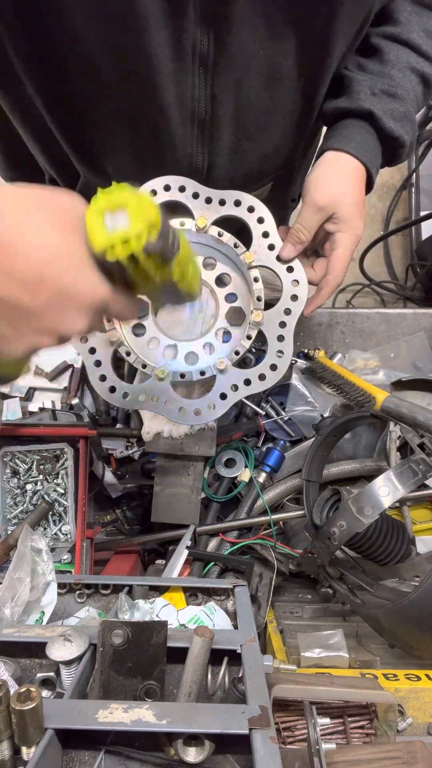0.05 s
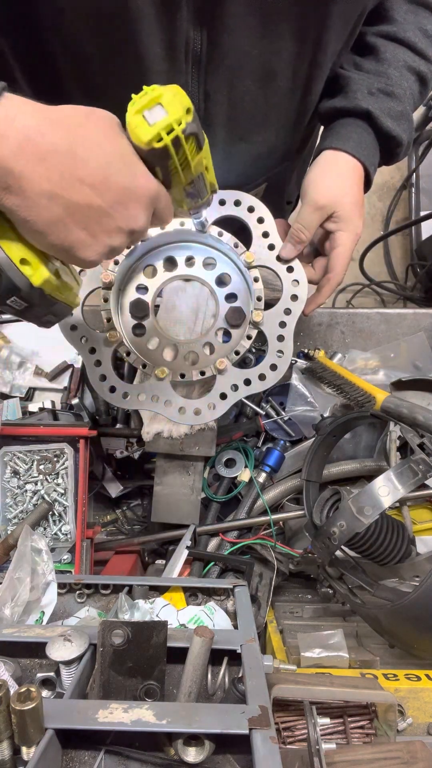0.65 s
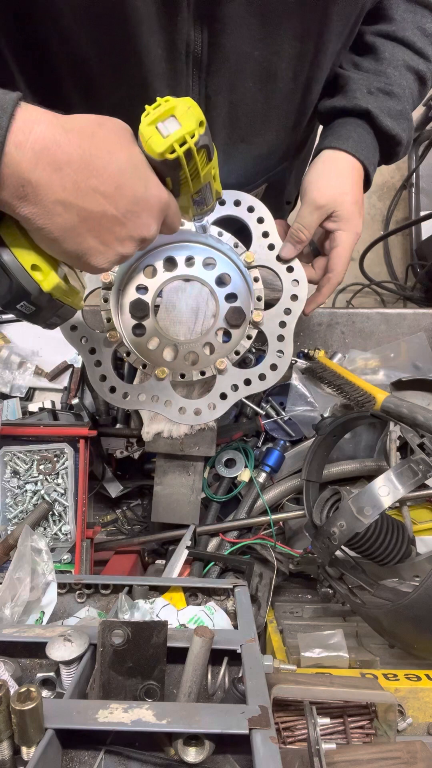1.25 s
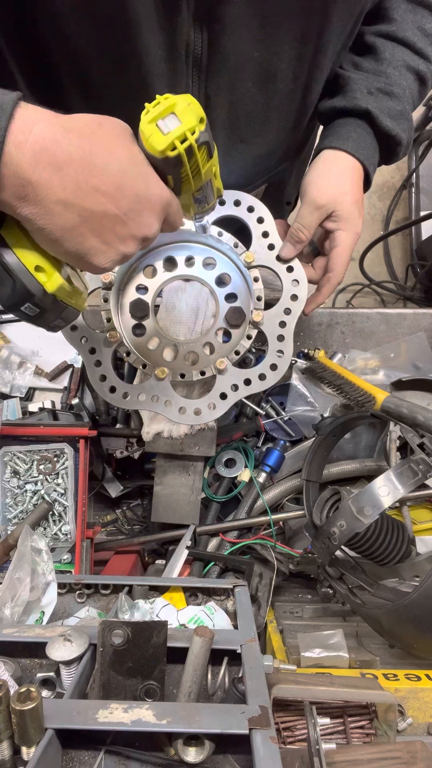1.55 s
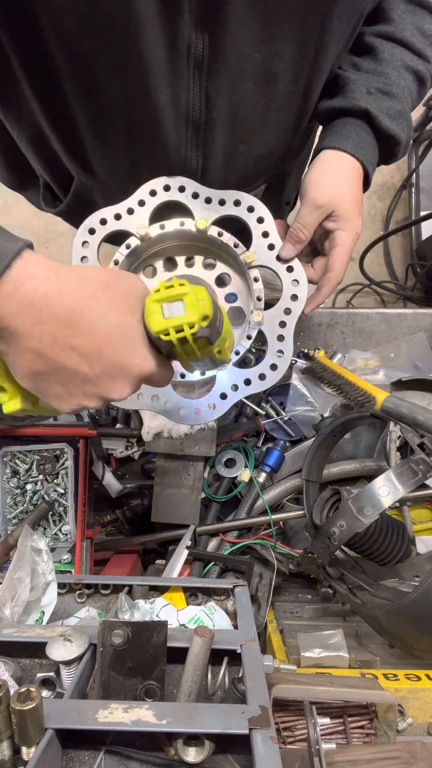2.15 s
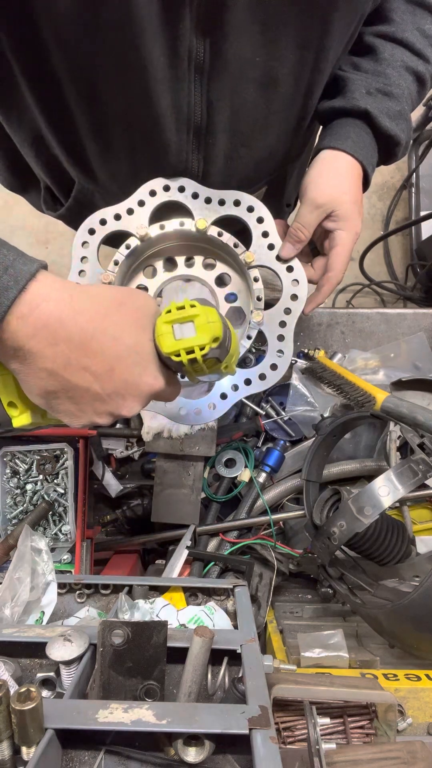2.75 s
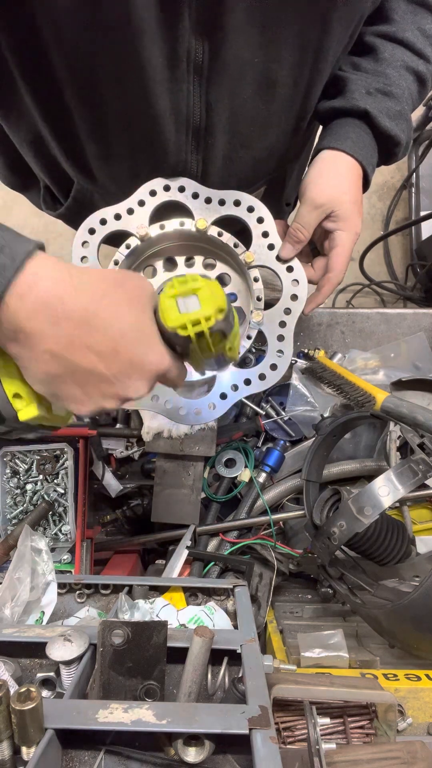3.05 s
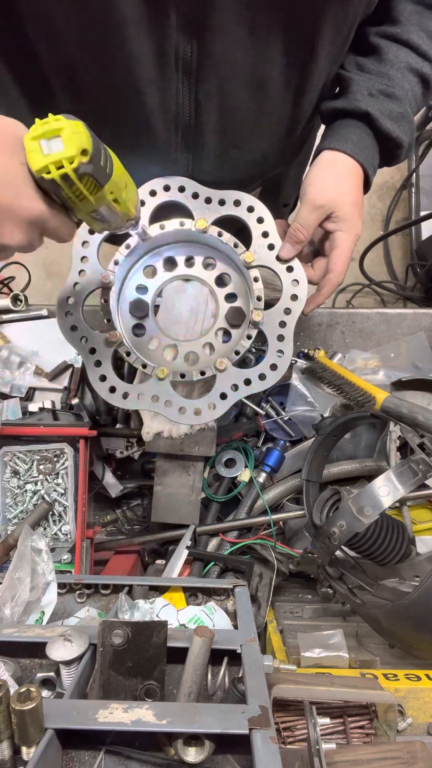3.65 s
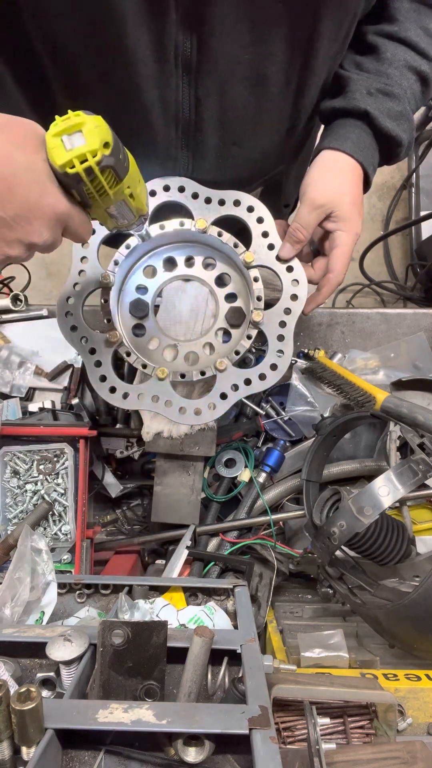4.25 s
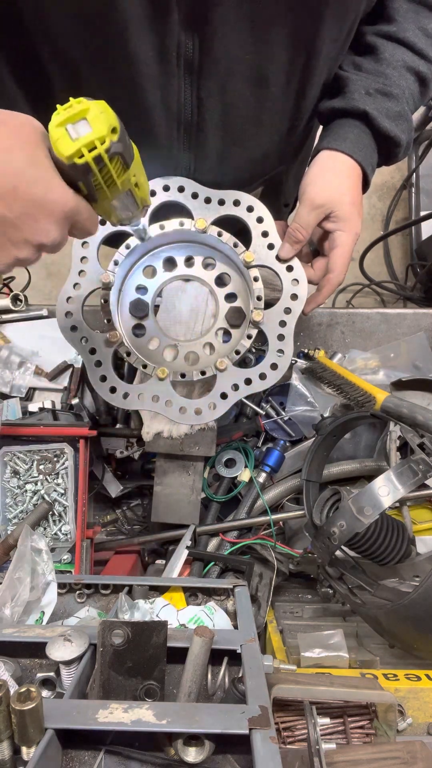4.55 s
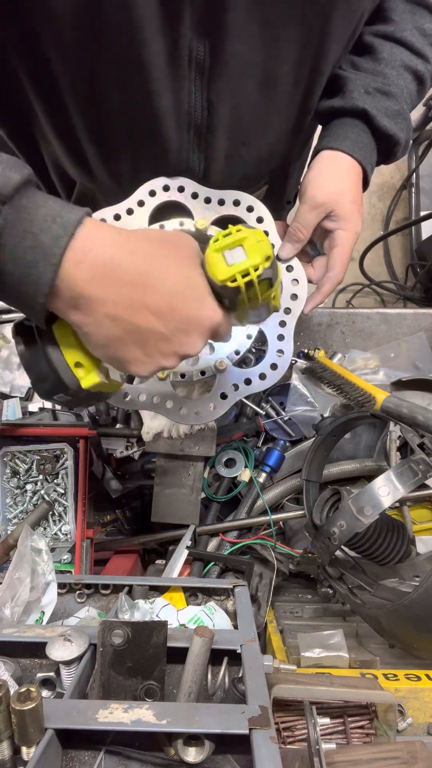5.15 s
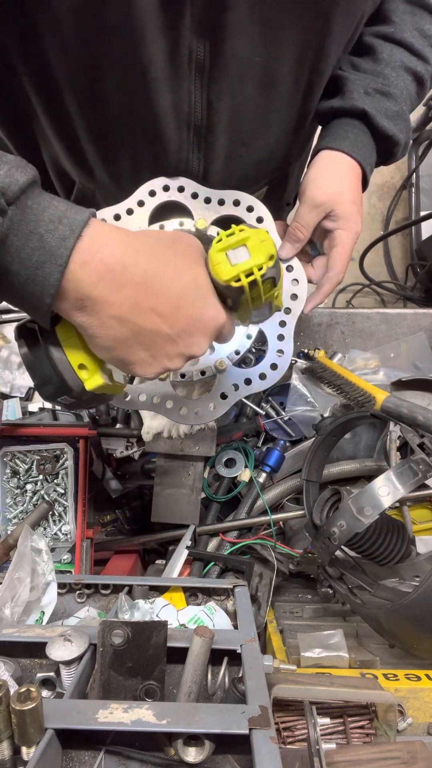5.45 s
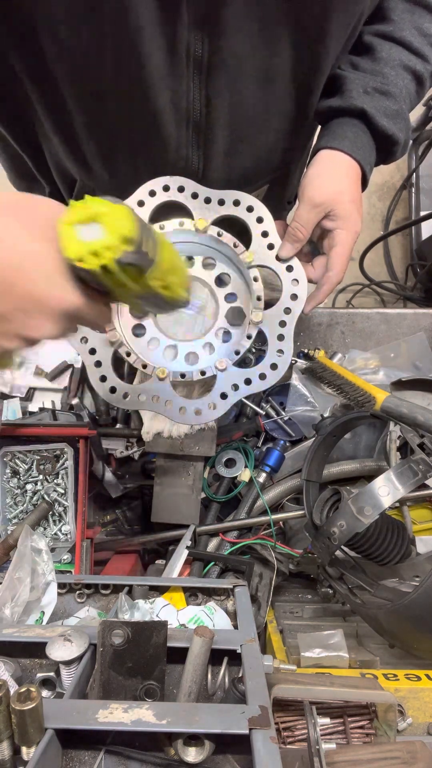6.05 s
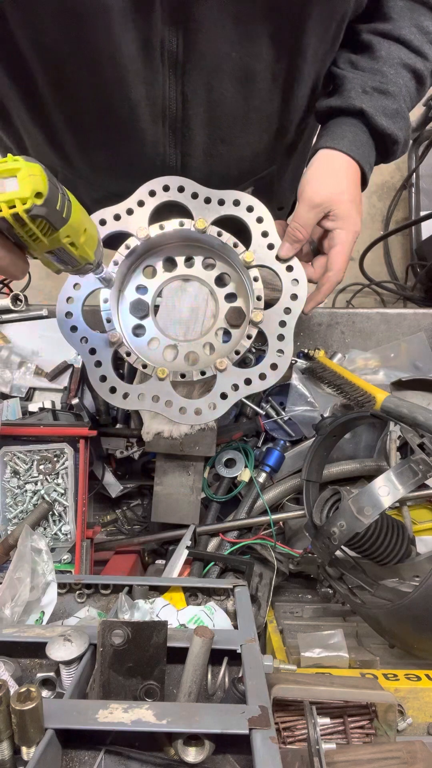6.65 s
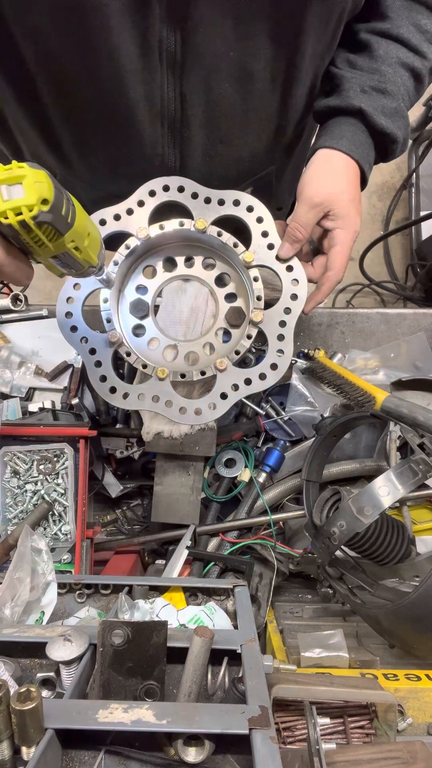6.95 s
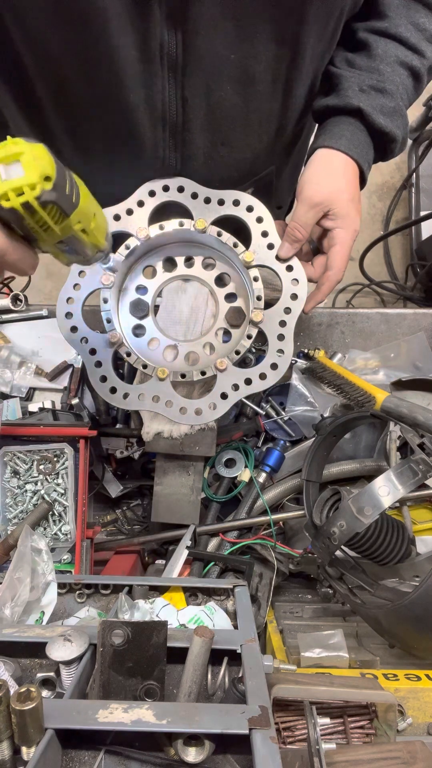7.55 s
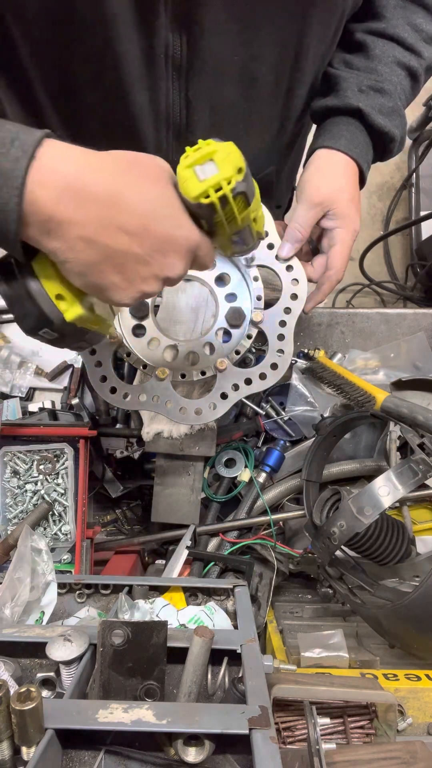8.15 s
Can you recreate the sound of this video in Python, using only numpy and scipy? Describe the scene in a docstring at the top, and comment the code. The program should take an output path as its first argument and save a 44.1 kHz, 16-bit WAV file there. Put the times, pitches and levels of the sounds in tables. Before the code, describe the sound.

A cordless impact driver runs five bolts into a steel brake rotor, each whining burst ending in a rapid metallic rattle.

```python
"""A cordless impact driver runs five bolts into a steel brake rotor and hub, close to a microphone pair.
Each time the socket clicks onto the bolt, the speed control whistles with its chopped current,
the gears wind up, and the hammer rattles on its anvil until the bolt is tight, ringing the rotor.
The hub thumps on its bench; further off, the workshop walls ring on over a low machine rumble."""
import sys
import numpy as np
from scipy import signal
from scipy.fft import rfft, irfft, next_fast_len
from scipy.io import wavfile
from scipy.ndimage import uniform_filter1d, map_coordinates

SR = 44100
rng = np.random.default_rng(int(sys.argv[2]) if len(sys.argv) > 2 else 0)


def to_wav(sig):
    """Store sig (one row per channel, or 1-D mono) as 16-bit WAV at the path in sys.argv[1].

    Samples outside -1..1 are clipped; the rate is SR.
    """
    pcm = np.clip(np.atleast_2d(sig), -1, 1) * 32767
    pcm = np.round(pcm).astype(np.int16)
    wavfile.write(sys.argv[1], SR, pcm.T)  # frames by channels


N = 366447


def amp(db):
    """Decibels to gain."""
    return 10 ** (np.asarray(db) / 20)


def unit(x):
    """x at rms 1."""
    return x / np.sqrt(np.mean(x ** 2) + 1e-20)


def along(points, hz):
    """Read (f/Hz, value) points on a log frequency axis."""
    f, values = np.transpose(points)
    return np.interp(np.log(hz + 1), np.log(f + 1), values)


def wobble(rate, size):
    """A smooth random curve, rate knots a second."""
    knots = rng.standard_normal(int(size * rate / SR) + 4)
    steps = np.arange(0, len(knots) - 1, .125)
    return np.interp(np.arange(size) * rate / SR, steps, map_coordinates(knots, [steps]))


def filtered(x, response):
    """x times a complex response of frequency."""
    n = x.shape[-1]
    padded = next_fast_len(n + 4096, True)
    return irfft(rfft(x, padded) * response(np.fft.rfftfreq(padded, 1 / SR)), padded)[..., :n]


def through_body(x, spectrum):
    """x through a minimum-phase body with this (f/Hz, level/dB) spectrum."""
    def response(hz):
        cepstrum = irfft(np.log(amp(along(spectrum, hz)) + 1e-6))
        half = len(cepstrum) // 2
        return np.exp(rfft(np.r_[cepstrum[0], 2 * cepstrum[1:half], np.zeros(half)]))
    return filtered(x, response)


def resonate(x, modes):
    """x through (f/Hz, width/Hz, level/dB) resonances; little of their ring reaches the top treble."""
    def response(hz):
        body = sum((-1) ** k * amp(db) * 1j * hz * width / (f * f - hz * hz + 1j * hz * width)
                   for k, (f, width, db) in enumerate(modes))
        return body / (1 + (hz / 10500) ** 12)
    return filtered(x, response)


def noise(spectrum, size):
    """Coloured noise of rms 1."""
    return unit(filtered(rng.standard_normal(size), lambda hz: amp(along(spectrum, hz))))


def gate(t, start, stop, fade):
    """1 between start and stop, with sloping edges."""
    return np.clip(np.minimum(t - start, stop - t) / fade, 0, 1)


def add(track, s, x):
    """Mix x into the track at s seconds."""
    part = track[max(round(s * SR), 0):][:len(x)]
    part += x[:len(part)]


# Machines at the back of the shop: f/Hz, level/dB
RUMBLE = [(25, -15), (50, 0.5), (76, -0.5), (100, -4.5), (150, -13.5), (215, -19), (280, -25.5), (560, -24),
          (700, -31), (1000, -28), (2400, -36), (8000, -64.5), (11000, -105)]

def machines(rumble_db=-49.5, hum_hz=79, hum_db=-54):
    """Machines rumble and hum; the bass reaches both microphones alike, the rest spreads wide."""
    t = np.arange(N) / SR
    mid = amp(rumble_db) * noise(RUMBLE, N)
    spread = [(90, -39.5), (250, -11), (1000, -.5)]  # f/Hz, level/dB
    side = filtered(amp(rumble_db) * noise(RUMBLE, N), lambda hz: amp(along(spread, hz)))
    hum_level = np.sqrt(2) * amp(hum_db + 3.2 * wobble(1.2, N))
    hum = hum_level * np.sin(2 * np.pi * hum_hz * t + .5 * wobble(8.1, N))
    return mid + hum + np.array([side, -side])


def fading_room(level_db=-58.5, t60=.66):
    """Gear noise from the bolt before dies away between the walls."""
    return amp(level_db - 60 * np.arange(N) / SR / t60) * noise(GEAR_RASP, N)


# The disc's hollow clang under each contact: f/Hz, level/dB
DISC_CLANG = [(100, -21.5), (380, 0), (650, -12.5), (950, 0.5), (1500, 1.5), (2200, 5), (3200, -6),
              (8000, -22.5), (12000, -55)]

def steel_hits(rows, spectrum, modes, lead_s, crack_t60, chatter_db, chatter_t60, ring_db, clang_db):
    """Steel on steel: a brief scrape up to a hard crack, loose parts chatter, the struck part rings."""
    out, t = np.zeros(N), np.arange(SR // 8) / SR - .012
    after = np.maximum(t, 0)
    rise = amp(60 * np.minimum(t, 0) / lead_s)
    decay = amp(-60 * after / crack_t60) + amp(chatter_db - 60 * after / chatter_t60)
    force = rise * decay * rng.standard_normal((len(rows), len(t)))
    cracks = through_body(force, spectrum)
    rings = resonate(force, modes)
    clangs = through_body(force, DISC_CLANG)
    for (s, db, *extra_clang_db), crack, ring, clang in zip(rows, cracks, rings, clangs):
        hit = crack + amp(ring_db + 2 * rng.standard_normal()) * ring
        loudest = np.sqrt(np.max(uniform_filter1d(hit ** 2, size=88)))  # rms over 2 ms
        hit += amp(clang_db + sum(extra_clang_db)) * clang
        add(out, s + t[0] + .0016, amp(db) * hit / loudest)  # the crack follows first touch
    return out


# The socket meets the bolt head, slips on or takes up its play: t/s, level/dB, extra clang/dB
SOCKET_CLICKS = [(.379, -19, 2.5), (.765, -28, -9.5), (.875, -15, 0), (.893, -23, -6), (0.926, -20, 0),
                 (2.104, -24.5, 5.5), (2.19, -23.5, -3), (2.203, -24.5, 3), (2.298, -23, 2),
                 (2.308, -14, -14.5), (2.346, -26.5, -1), (2.453, -15, -10), (3.597, -18, 5.5),
                 (3.639, -26, -2), (3.671, -25, 6.5), (3.79, -32.5, 19), (3.882, -21.5, -2),
                 (3.92, -24.5, -4), (3.931, -16, -10), (5.008, -12.5, 4), (5.045, -21, 12),
                 (5.142, -25, 11), (5.214, -27.5, -8), (5.285, -11, -20.5), (6.393, -23, 4),
                 (6.472, -29.5, 9), (6.62, -42.5, 0.5), (6.808, -32.5, -6), (6.863, -15, -14),
                 (6.901, -15, 9), (8.019, -22.5, -3), (8.038, -20.5, 4), (8.17, -41.5, 15)]
# Its crack, close up: f/Hz, level/dB
SOCKET_CRACK = [(120, -39), (200, -13.5), (397, -1.5), (711, -13.5), (984, -1.5), (1640, -10.5), (2160, 4),
                (3260, 1.5), (3620, 8), (5360, 5), (9440, -3.5), (12000, -34.5), (15600, -65.5),
                (22000, -120)]
# Its loose clink: f/Hz, width/Hz, level/dB
SOCKET_MODES = [(975, 51, -3), (2300, 90, -3), (4190, 40, 6.5), (3944, 89, -0.5), (4530, 19, -8),
                (5250, 160, -10), (5600, 600, -11), (6770, 25, -3.5), (7080, 23, -11), (8900, 24, -7)]

def socket_clicks(rebound_s=.032, rebound_db=-16.5):
    """The socket clicks on the bolt head and drops back lightly for a second touch."""
    rebounds = [(s + rebound_s * rng.uniform(.47, 1.9), db + rebound_db, clang_db)
                for s, db, clang_db in SOCKET_CLICKS]
    return steel_hits([*SOCKET_CLICKS, *rebounds], SOCKET_CRACK, SOCKET_MODES, lead_s=.007,
                      crack_t60=.016, chatter_db=-19, chatter_t60=.09, ring_db=3, clang_db=-9)


# The workshop around the microphones: f/Hz, t60/s
WALL_DECAY = [(100, .4), (500, 0.77), (2000, 0.77), (5000, 0.61), (9000, 0.55), (14000, 0.42)]

def workshop(x, side_db=-7, early_db=13, early_t60=.049):
    """Bench and clutter nearby answer at once, the walls ring on, longest in the midrange."""
    hz, t, spectra = signal.stft(rng.standard_normal((2, int(SR * .9))), SR, nperseg=256)
    decay = amp(-60 * t / along(WALL_DECAY, hz)[:, None]) + amp(early_db - 60 * t / early_t60)
    tail = signal.istft(spectra * decay, SR, nperseg=256)[1]
    tail = np.pad(tail / np.linalg.norm(tail[0]), ((0, 0), (130, 0)))  # arrives 3 ms late
    mid, side = signal.fftconvolve(x[None], tail, axes=1)[:, :N]
    return np.array([mid + amp(side_db) * side, mid - amp(side_db) * side])


# The hub is pushed on the bench: t/s, level/dB, extra knock/dB
HUB_PUSHES = [(.397, -25, -12.5), (.726, -29.5, -19), (.948, -20, -10.5), (2.197, -31, -11.5),
              (2.96, -25, -20), (3.669, -39.5, 0), (4.529, -22.5, -9), (4.569, -22.5, -12),
              (5.022, -34, -4.5), (5.151, -36, -4.5), (6.92, -29, -5.5), (8.068, -30, -16)]
# The bench's dull thud: f/Hz, level/dB
BENCH_THUD = [(21, -40.5), (35, -25), (63, -3.5), (81, 3.5), (190, -10.5), (269, -25.5), (361, -12.5),
              (400, -22.5), (520, -51), (880, -120)]
# The woody knock on top: f/Hz, level/dB
BENCH_KNOCK = [(120, -13.5), (200, 0.5), (380, 10), (700, -2), (1050, 5.5), (1500, -22.5), (4000, -43.5)]

def hub_thumps(thud_db=-7.5, thud_t60=.51, knock_db=3.5, knock_t60=.11, recoil_s=.14):
    """The hub rocks on the bench when pushed, and from the torque just after each bolt seats."""
    out, t = np.zeros(N), np.arange(SR // 3) / SR
    attack = 1 - np.exp(-t / .009)
    recoils = [(seated + recoil_s, -26, -15.5) for _, _, seated, *_ in BOLT_RUNS]
    for s, db, extra_knock_db in [*HUB_PUSHES, *recoils]:
        thud = amp(thud_db - 60 * t / thud_t60) * noise(BENCH_THUD, len(t))
        knock = amp(knock_db + extra_knock_db - 60 * t / knock_t60) * noise(BENCH_KNOCK, len(t))
        add(out, s, amp(db) * (thud + knock) * attack)
    return out


# The driver at the bench, a row a bolt: motor and switching tone first heard t/s,
# wind-up curve begins t/s, bolt seated t/s, trigger released t/s, free gear mesh f/Hz,
# gear level/dB, switching tone level/dB
BOLT_RUNS = [(.82, 1.0, 1.39, 1.59, 650, -26, -57), (2.395, 2.455, 2.782, 2.945, 770, -27.5, -56),
             (3.915, 3.89, 4.272, 4.44, 770, -25, -41), (5.27, 5.245, 5.57, 5.735, 770, -26, -56),
             (6.86, 6.835, 7.265, 7.445, 560, -28, -62)]
# The switching tone's 2nd and 3rd harmonics: level/dB
SWITCH_OVERTONES = [-48.5, -56.5]

def speed_control(switch_hz=1929):
    """The chopped motor current sings at one pitch from the motor's first sound until the bolt seats."""
    out = np.zeros(N)
    for sound_starts, _, seated, *_, tone_db in BOLT_RUNS:
        t = np.arange(int(sound_starts * SR), int(seated * SR)) / SR
        tone = sum(amp(db + 1.9 * wobble(25, len(t))) * np.sin(2 * np.pi * k * switch_hz * t)
                   for k, db in enumerate([tone_db, *SWITCH_OVERTONES], 1))
        add(out, sound_starts, np.sqrt(2) * tone * gate(t, sound_starts, seated, .0076))
    return out


# How the driver's housing passes the whine: f/Hz, level/dB
HOUSING = [(300, -40), (900, -16), (1700, -12), (2600, -7.5), (3400, -1.5), (4150, 1), (4600, -7),
           (5300, -12), (7000, -21), (9000, -38), (12000, -100)]

def gear_whine(shaft, mesh_hz, odd_db=-5, scatter_db=2.8, planet_depth=.5):
    """Shaft harmonics climb through the housing's resonances; two meshes a turn favour the even ones."""
    tones = np.zeros(len(shaft))
    for k in range(3, 40):
        level = amp(odd_db * (k % 2) + scatter_db * wobble(14, len(shaft)))
        tones += level * np.sin(k * shaft + rng.uniform(0, 2 * np.pi))
    tones *= 1 + planet_depth * np.cos(shaft / 3)  # the planet gears add sidebands
    tones *= mesh_hz / mesh_hz.max()  # the whine grows with speed
    return unit(through_body(tones, HOUSING))


# The gear teeth, close up: f/Hz, level/dB
GEAR_RASP = [(88, -43), (150, -17), (589, -17.5), (702, -23.5), (1020, -7.5), (1120, -19.5), (1630, -17),
             (1900, -9), (2500, -14), (4160, -10), (4860, -9.5), (9630, -16), (11000, -33), (12200, -83.5),
             (16000, -92.5)]

def gear_rasp(shaft, tooth_db=5, planet_db=-.5, grit_db=2.5):
    """Gritty noise pulses as the teeth mesh and the planet gears go round."""
    n = len(shaft)
    pulse_db = tooth_db * np.cos(2 * shaft) + planet_db * np.cos(shaft / 3) + grit_db * wobble(300, n)
    return unit(through_body(rng.standard_normal(n) * amp(pulse_db), GEAR_RASP))


def mesh_rate(t, wind_up_from, seated, released, free_hz, coast_s,
              creep_hz=109.95, spin_up_s=.15, sag_hz_per_s=500):
    """The motor creeps, winds up towards its free speed, sags under the hammer and coasts down."""
    driven = free_hz - (free_hz - creep_hz) * np.exp(-np.maximum(t - wind_up_from, 0) / spin_up_s)
    sag = sag_hz_per_s * np.clip(t - seated, 0, released - seated)
    return (driven - sag) * np.exp(-np.maximum(t - released, 0) / coast_s)


# The spinning socket's main ring: f/Hz, width/Hz, level/dB
SOCKET_RING = [(4110, 90, 0)]
# It runs off centre and sings up: t/s, level/dB
SOCKET_SWELLS = [(1.22, -29), (1.32, -26.5), (4.07, -22.5), (4.17, -24), (5.38, -25.5), (5.43, -19),
                 (5.49, -31), (5.55, -15.5), (7.24, -33.5)]

def motor(coast_s=.14, jitter=.005, slack_db=-12.5, release_s=.018, swell_s=.026):
    """The gears whine and rasp, louder with speed, and go slack on release; the rasp rings the socket."""
    out = np.zeros(N)
    for sound_starts, wind_up_from, seated, released, free_hz, level_db, _ in BOLT_RUNS:
        t = np.arange(int(sound_starts * SR), int((released + 2 * coast_s) * SR)) / SR
        mesh_hz = mesh_rate(t, wind_up_from, seated, released, free_hz, coast_s)
        mesh_hz *= 1 + jitter * wobble(150, len(t))
        shaft = np.pi * np.cumsum(mesh_hz) / SR  # angle, half a turn a mesh
        slack = np.clip((t - released) / release_s, 0, 1)
        loudness = amp(level_db + slack_db * slack) * (mesh_hz / 700) ** .97
        whine, rasp = gear_whine(shaft, mesh_hz), gear_rasp(shaft)
        gears = loudness * (amp(-4) * whine + amp(-5.2) * rasp)
        swells = sum(amp(db) * np.exp(-((t - s) / swell_s) ** 2) for s, db in SOCKET_SWELLS)
        ring = (amp(-12) * loudness + swells) * unit(resonate(rasp, SOCKET_RING))
        add(out, t[0], (gears + amp(-5) * ring) * gate(t, t[0], t[-1], .02))
    return out


# Friction under the bolt head: f/Hz, level/dB
SEAT_GRIND = [(150, -4.5), (350, -1.5), (700, -5.5), (1000, 0.5), (1600, 2), (2200, 3), (3000, 2),
              (5000, -5), (9000, -19.5), (12000, -54.5)]

def grinding(level_db=-28, fade_db_per_s=-46.5, edge_s=.011):
    """The bolt head grinds on its seat, less as it comes to rest."""
    out, t = np.zeros(N), np.arange(SR // 3) / SR
    for _, _, seated, released, *_ in BOLT_RUNS:
        level = amp(level_db + fade_db_per_s * t + .83 * wobble(120, len(t)))
        turning = gate(t, 0, released - seated + edge_s, edge_s)
        add(out, seated, level * turning * noise(SEAT_GRIND, len(t)))
    return out


# The hardest hammer blows: t/s, level/dB
HARD_BLOWS = [(1.4084, -3), (1.4203, -6.5), (1.439, -6), (1.4784, -3.5), (1.496, -3), (1.5524, -1),
              (1.5769, -3.5), (2.8015, -5), (2.8121, -4.5), (2.829, -1), (2.858, -0.5), (2.8759, -7.5),
              (2.9047, -9), (2.9161, -4), (2.9353, -4.5), (4.3005, -5), (4.3266, -7), (4.3424, -1.5),
              (4.3519, -5.5), (4.372, -6), (4.4128, -6.5), (4.4321, -2.5), (5.5889, -4.5), (5.5988, -5),
              (5.6353, -3.5), (5.6466, -4), (5.665, -8.5), (5.7072, -3), (6.916, -4), (6.9343, -6.5),
              (6.9491, -7.5), (6.9726, -6.5), (7.2855, 0), (7.2967, -4), (7.3113, -6), (7.3369, -4.5),
              (7.3507, -1.5), (7.369, -5), (7.414, -5)]
# The anvil's crack, close up: f/Hz, level/dB
ANVIL_CRACK = [(59, -43), (100, 1), (197, -7), (234, -18), (358, -12.5), (676, -13), (991, -5.5),
               (1130, -14), (1610, -3), (2130, 7.5), (2750, -2.5), (4020, 5), (8640, -2), (12000, -26),
               (16000, -42)]
# Rotor and hub ringing on the bench: f/Hz, width/Hz, level/dB
ROTOR_MODES = [(358, 6, -14), (845, 20, -9.5), (1023, 23, -15.5), (2105, 110, 4), (2190, 82, -36),
               (2990, 32, 1), (2894, 55, -18), (3570, 42, -46.5), (3960, 270, -7.5), (4540, 31, -23.5),
               (4860, 38, -11.5), (5670, 62, -17.5), (5300, 33, -13.5), (6790, 240, -8.5), (8810, 56, -5.5)]

def hammer(gap_s=.017, light_db=-17.5, fade_db_per_s=-21, scatter_db=3, count=20):
    """The hammer strikes the anvil: hard blows amid a light, uneven rattle from seating to release."""
    blows = list(HARD_BLOWS)
    for _, _, seated, released, *_ in BOLT_RUNS:
        after = gap_s * (np.arange(count) + 1 + rng.uniform(0, .5, count))
        level_db = light_db + fade_db_per_s * after + scatter_db * rng.standard_normal(count)
        blows += [(s, db) for s, db in zip(seated + after, level_db) if s < released]
    return steel_hits(blows, ANVIL_CRACK, ROTOR_MODES, lead_s=.012, crack_t60=.012,
                      chatter_db=-22.5, chatter_t60=.07, ring_db=5.5, clang_db=-16)


# Ticking inside the coasting driver: from t/s, to t/s, first level/dB
COAST_SPANS = [(1.626, 1.66, -21), (7.461, 7.57, -17.5)]

def cam_ticks(gap_s=.02, loss_db=1.2):
    """The hammer ticks evenly over its cam as the motor coasts, each tick weaker than the last."""
    ticks = [(s, db - loss_db * k) for start, stop, db in COAST_SPANS
             for k, s in enumerate(np.arange(start, stop, gap_s))]
    return steel_hits(ticks, ANVIL_CRACK, ROTOR_MODES, lead_s=.005, crack_t60=.008,
                      chatter_db=-30, chatter_t60=.03, ring_db=1, clang_db=-20.5)


# The arm moves at the bench: from t/s, to t/s, level/dB
SLEEVE_STROKES = [(3.13, 3.64, -57.5), (8.235, 8.45, -47.5)]

def sleeve(fade_s=.075):
    """A sleeve brushes with a soft hiss as the arm moves."""
    t = np.arange(N) / SR
    # f/Hz, level/dB
    cloth = [(150, -23.5), (400, .5), (1200, 2.5), (4000, 4), (7000, 0), (9500, -13.5), (11500, -42)]
    strokes = sum(amp(db) * gate(t, start, stop, fade_s) ** 2 for start, stop, db in SLEEVE_STROKES)
    return strokes * amp(wobble(35, N)) * noise(cloth, N)


def shop_whine(hz=828, level_db=-64, start_s=5.9, rise_s=1.3):
    """A faint, wavering tone swells in the background."""
    t = np.arange(N) / SR
    swell = np.clip((t - start_s) / rise_s, 0, 1) ** .5
    level = np.sqrt(2) * amp(level_db + 2 * wobble(17, N))
    return swell * level * np.sin(2 * np.pi * hz * t + .6 * wobble(25, N))


def scene():
    """Driver, bolts and bench close up and centred, the workshop spread behind them."""
    background = machines() + fading_room() + shop_whine()
    near = amp(-8.5) * socket_clicks() + speed_control() + amp(-2.5) * motor()
    near += grinding() + amp(-7) * (hammer() + cam_ticks())
    return near + hub_thumps() + sleeve() + amp(-7.5) * workshop(near) + background


# Width of the microphone pair: f/Hz, side over mid level/dB
PAIR_WIDTH = [(100, -30), (6000, -15), (8000, -6), (11000, 10), (16000, 26.5)]

def record(dry, ceiling=.9, top_hz=16400):
    """Two microphones, out of phase in the top treble, round off peaks and cut deep bass and the top."""
    side = filtered(dry.mean(0), lambda hz: 1j * amp(along(PAIR_WIDTH, hz)))
    pair = dry + np.array([side, -side])
    rounded = pair / (1 + (pair / ceiling) ** 10) ** (1 / 10)
    low_cut = [(15, -31.5), (42, -.5)]  # f/Hz, level/dB
    return filtered(rounded, lambda hz: amp(along(low_cut, hz)) * np.clip((top_hz - hz) / 80, 0, 1))


dry = scene()
out = record(dry)
to_wav(out)
```